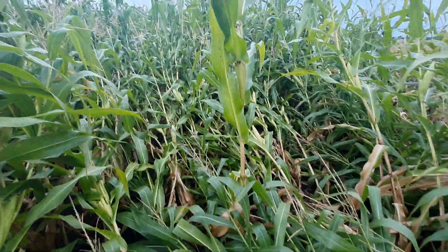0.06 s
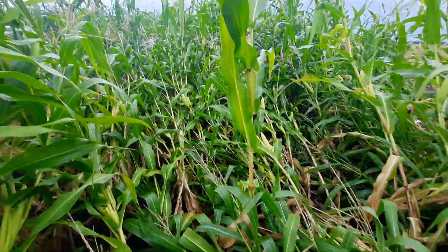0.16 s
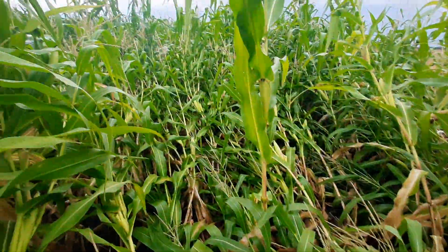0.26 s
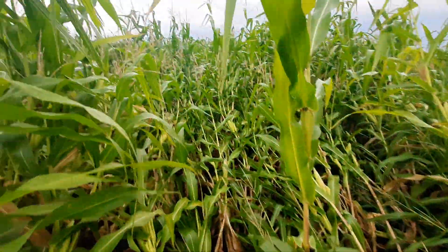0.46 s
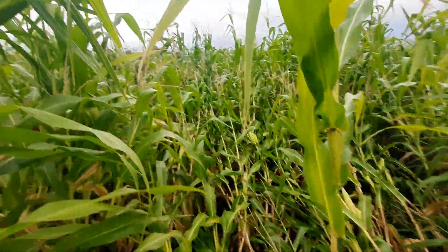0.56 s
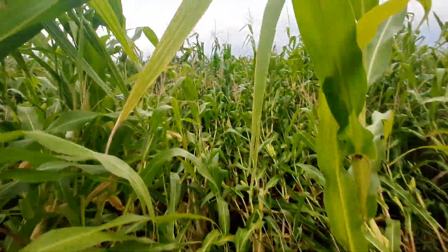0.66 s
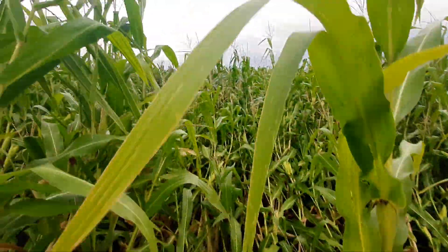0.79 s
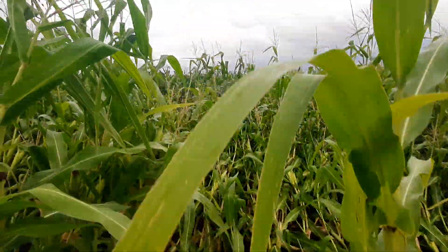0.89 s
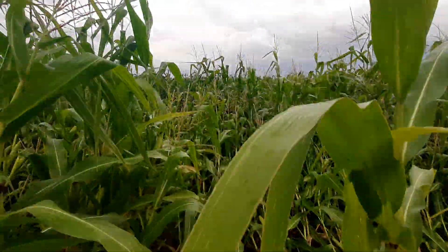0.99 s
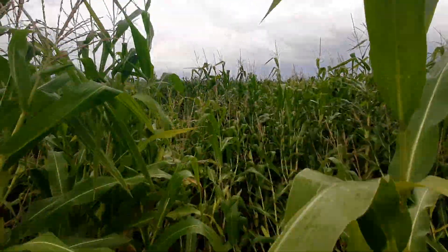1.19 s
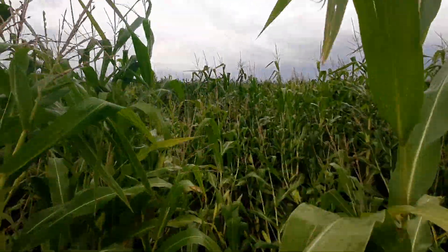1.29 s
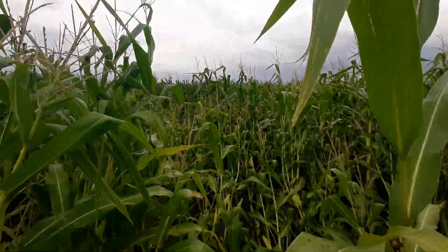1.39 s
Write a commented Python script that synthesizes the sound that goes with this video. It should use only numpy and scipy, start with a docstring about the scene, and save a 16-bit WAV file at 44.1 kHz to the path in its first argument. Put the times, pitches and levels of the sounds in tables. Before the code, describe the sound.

Corn leaves rustle in a field, starting softly and swelling from about 0.2 seconds to a crackly peak near 0.5. Close blades snap sharply around 0.25 and 0.5 seconds, with a soft flap near 0.3. The rustle then fades, with brief leaf scrapes from 0.75 to 1.1 seconds, and is very quiet by 1.4. Faint wind rumbles on the microphone, and a faint low hum dies by 0.9.

```python
"""Countless corn leaves rustle, swell and settle as a gust passes through a tall field.
Their tiny contacts crackle over a smooth rush and the dull swish of swinging blades.
Close by, single blades slide over each other with a rasp, snap as they buckle or strike,
and flap with a soft thud. Wind rumbles softly on the microphone and a faint low hum dies away."""
import sys
import numpy as np
from scipy import signal
from scipy.fft import rfft, irfft
from scipy.io import wavfile

SR = 44100
rng = np.random.default_rng(int(sys.argv[2]) if len(sys.argv) > 2 else 0)


def bounce(signal):
    """Save signal as a 16-bit WAV file at the path given by the first command-line argument."""
    frames = np.transpose(np.atleast_2d(signal))
    limited = np.clip(frames, -1, 1)
    pcm = np.round(limited * 32767).astype(np.int16)
    wavfile.write(sys.argv[1], SR, pcm)


N = 63945
TIME_S = np.arange(N) / SR
FREQS_HZ = np.fft.rfftfreq(N, 1 / SR)


def from_db(db):
    """Turn decibels into a number to multiply by."""
    return 10 ** (np.asarray(db) / 20)


def unit_power(x):
    """Scale a signal so that its average power is 1."""
    return x / np.sqrt(np.mean(x ** 2) + 1e-20)


def gain_curve(rows):
    """Join (time_s, level_db) points into a gain over time."""
    return from_db(np.interp(TIME_S, *np.transpose(rows)))


def over_freqs(rows):
    """Join (freq_hz, value) points into a curve over all frequencies."""
    hz, value = np.transpose(rows)
    return np.interp(np.log(FREQS_HZ + 1), np.log(hz), value)


def peak(centre_hz, width_octaves):
    """A bell-shaped bump of height 1 around one frequency."""
    return np.exp(-.5 * (np.log2((FREQS_HZ + 1) / centre_hz) / width_octaves) ** 2)


def pan(db):
    """Left and right gains: positive db leans left, negative leans right."""
    return from_db(np.array([[db], [-db]]) / 2)


def drift(rate_hz):
    """A smooth random wander, about 1 in size."""
    r = np.exp(-2 * np.pi * rate_hz / SR)
    return unit_power(signal.lfilter([1], [1, -2 * r, r * r], rng.standard_normal(2 * N))[N:])


def noise_pair():
    """Two unrelated white noises."""
    return rng.standard_normal((2, N))


# How alike left and right are (1 is the same, 0 unrelated): freq_hz, likeness
STEREO_LIKENESS = [(30, 0.63), (110, 0.87), (230, .9), (500, 0.86), (1000, 0.8), (2000, 0.33),
                   (4000, 0.053), (8000, 0)]

def spread(pair, tone_db):
    """Shape the tone of two signals and spread them: alike in the bass, apart in the treble."""
    mid, side = rfft(pair) * from_db(tone_db)
    alike = over_freqs(STEREO_LIKENESS)
    mid, side = mid * np.sqrt(1 + alike), side * np.sqrt(1 - alike)
    return unit_power(irfft([mid + side, mid - side], N))


def ring(clicks, hz, fade_s):
    """Each click starts a pure tone that falls 60 dB in fade_s."""
    r = np.exp(-np.log(1000) / (fade_s * SR))
    step = 2 * np.pi * hz / SR
    return signal.lfilter([0, np.sin(step)], [1, -2 * r * np.cos(step), r * r], clicks + 1e-18)


def die_away(start_s, fade_s):
    """A gain that jumps to 1, then falls 60 dB in fade_s."""
    return (TIME_S >= start_s) * np.exp(-np.log(1000) * np.maximum(TIME_S - start_s, 0) / fade_s)


def crackles(per_s=2600, pitches=24, size_spread_db=2.5, ring_cycles=7.2):
    """Leaves touch at random; each tiny contact rings briefly at its own pitch."""
    out = 0
    for hz in np.geomspace(1100, 8000, pitches):
        touches = rng.random(N) < per_s / pitches / SR
        size = from_db(size_spread_db * np.minimum(rng.exponential(1, N), 3))
        clicks = touches * size * rng.uniform(-1.04, 1, (2, N))
        out += ring(clicks, hz, ring_cycles / hz) * np.sqrt(hz)
    return unit_power(out)


# How loud the field rustles as the gust passes: time_s, level_db
RUSTLE_LEVELS = [(0, -46.5), (.09, -48), (.125, -45), (.225, -38), (.255, -31.5), (.39, -31.5), (.415, -28),
                 (.47, -27), (.49, -29.5), (.55, -31.5), (.61, -37.5), (.70, -44), (.79, -41.5),
                 (.89, -50.5), (1.04, -53.5), (1.11, -56), (1.2, -63), (1.32, -60), (1.45, -64.5)]
# The tone of the rustle, from low to high: freq_hz, level_db
RUSTLE_TONE = [(400, -28), (900, -22.5), (1250, -6.5), (1550, -5), (2400, -3), (3200, 0.5), (4600, -0.5),
               (6000, -3), (7400, -0.5), (8500, -4.5), (12000, -3.5), (16000, -9)]
# Hollow resonances of the stalks and leaves: pitch_hz, boost_db
HOLLOW_PEAKS = [(1210, 4), (1530, 6.5), (2030, 7), (3140, 0.5)]
# How the rustle's treble dips and rises: time_s, change_db
RUSTLE_TREBLE = [(.03, -4.5), (.16, -1), (.23, -1), (.265, -3.5), (.3, 1), (.52, 0.5), (.66, 0), (.9, 0),
                 (1.4, 1)]

def rustle(crackle_share=.22, treble_from_hz=6000, flutter_db=.78):
    """Near leaves crackle over the smooth rush of far ones, swelling with the gust."""
    hollow_db = sum(db * peak(hz, width_octaves=.022) for hz, db in HOLLOW_PEAKS)
    contacts = np.sqrt(crackle_share) * crackles() + np.sqrt(1 - crackle_share) * noise_pair()
    leaves = spread(contacts, over_freqs(RUSTLE_TONE) + hollow_db)
    treble = irfft(rfft(leaves) * FREQS_HZ ** 4 / (FREQS_HZ ** 4 + treble_from_hz ** 4), N)
    leaves += (gain_curve(RUSTLE_TREBLE) - 1) * treble
    flutter = from_db(flutter_db * drift(rate_hz=24))
    return gain_curve(RUSTLE_LEVELS) * flutter * leaves


# How loud the swinging blades are: time_s, level_db
SWISH_LEVELS = [(0, -67), (.09, -60), (.11, -50.5), (.21, -50.5), (.25, -44.5), (.33, -44), (.45, -41),
                (.53, -43.5), (.62, -49.5), (.75, -55), (.9, -62), (1.1, -69.5), (1.25, -77.5),
                (1.45, -78.5)]
# Their dull tone: freq_hz, level_db
SWISH_TONE = [(60, -27), (120, -4), (190, -5.5), (400, -2.5), (520, -4), (720, -2.5), (1000, -5),
              (1600, -6), (4000, -30)]

def swish():
    """Whole blades swing through the air with a dull swish."""
    return gain_curve(SWISH_LEVELS) * spread(noise_pair(), over_freqs(SWISH_TONE))


# Swirls of air that hit the microphone: peak_s, level_db, left_minus_right_db
SWIRLS = [(.07, -63, -7), (.22, -60, -4), (.41, -60, 5), (.55, -60, -18), (.66, -59.5, -17),
          (.77, -67, -13), (.87, -62, -4), (.985, -58, 3), (1.11, -66.5, 1)]
# The deep tone of the wind: freq_hz, level_db
WIND_TONE = [(25, -34), (40, -16), (60, -4), (85, -10.5), (130, -20.5), (300, -33), (1000, -70)]

def wind(steady_db=-70, swirl_width_s=.036, evenness=.41):
    """Air rumbles on the microphone and swells with each swirl, often mostly on one side."""
    swirls = 0
    for peak_s, db, side_db in SWIRLS:
        swell = np.exp(-.5 * ((TIME_S - peak_s) / swirl_width_s) ** 2)
        swirls += from_db(db) * pan(side_db) * swell
    rumble = spread(noise_pair(), over_freqs(WIND_TONE))
    strength = np.sqrt(np.mean(np.abs(signal.hilbert(rumble)) ** 2, axis=0))
    rumble = unit_power(rumble / strength ** evenness)  # evenness: 0 is lumpy, 1 is steady
    return np.hypot(from_db(steady_db) * pan(db=-4), swirls) * rumble


# How loud the hum is: time_s, level_db
HUM_LEVELS = [(0, -71), (.2, -62), (.65, -63), (.8, -66.5), (.95, -90), (1.45, -93.5)]

def hum(pitch_hz=216, waver_db=2.5):
    """A faint low tone wavers and dies away."""
    waver = from_db(waver_db * drift(rate_hz=10))
    tone = np.sin(2 * np.pi * pitch_hz * TIME_S + .5 * drift(rate_hz=4.1))
    return gain_curve(HUM_LEVELS) * waver * unit_power(tone)


# One blade slides over another (a negative fade grows louder):
# start_s, length_s, level_db, rasp_pitch_hz, rasp_boost_db, treble_boost_db, fade_db
BLADE_SLIDES = [(0.018, 0.0073, -46, 1760, 19, 4, -4.5), (0.099, 0.014, -38, 2250, 4.5, -46, 10.5),
                (0.196, 0.0077, -37.5, 6900, 8, -12, 3), (0.236, 0.033, -31.5, 4500, -1, 23, 0),
                (0.5076, 0.0061, -20, 5040, 3, 4, 1), (0.518, 0.015, -31, 5000, 0, 6, 3),
                (0.762, 0.02, -35, 3160, 8.5, 2.5, 3.5), (0.786, 0.043, -45.5, 3100, 18, 14, 0),
                (0.808, 0.055, -46.5, 5350, 4, 13, -3.5), (0.909, 0.049, -42, 4240, 4.5, 5.5, 4.5),
                (0.994, 0.03, -46.5, 4500, 0, 10, 1), (1.061, 0.064, -49.5, 4230, 2.5, 2.5, 7),
                (1.128, 0.054, -56, 4700, 2, 6, 3.5), (1.196, 0.015, -65, 5800, 9, 0, -4),
                (1.258, 0.069, -62, 5500, 7, 7, -2.5), (1.344, 0.012, -51.5, 4650, 7, 5, -4),
                (1.357, 0.033, -48, 2880, 9, -11, 17)]
# The tone that all slides start from: freq_hz, level_db
SLIDE_TONE = [(100, -46), (400, -11.5), (1000, -9), (1550, -6.5), (2500, -5), (4500, 1.5), (7300, -3.5),
              (12000, -8), (16000, -14)]

def slides(rise_s=.0024, release_s=.0038, treble_from_hz=5900):
    """Rough blades catch, rasp along each other and part."""
    out = 0
    treble = FREQS_HZ ** 2 / (FREQS_HZ ** 2 + treble_from_hz ** 2)
    for start_s, length_s, db, rasp_hz, rasp_db, treble_db, fade_db in BLADE_SLIDES:
        age_s = TIME_S - start_s
        catch = np.clip(age_s / rise_s, 0, 1)
        part = np.exp(-np.maximum(age_s - length_s, 0) / release_s)
        gain = from_db(db - fade_db * np.clip(age_s / length_s, 0, 1))
        boost_db = rasp_db * peak(rasp_hz, width_octaves=.12) + treble_db * treble
        out += catch * part * gain * spread(noise_pair(), over_freqs(SLIDE_TONE) + boost_db)
    return out


# A stiff blade buckles or strikes: start_s, level_db, ring_pitch_hz, ring_boost_db
BLADE_SNAPS = [(0.1059, -37, 2450, 0), (.159, -45, 740, 8), (0.2377, -19, 6060, -16),
               (.246, -22.5, 4440, -5), (0.3103, -35, 3130, 8.5), (0.3288, -33, 4080, 7),
               (.372, -29, 2050, -16), (0.405, -59, 2030, -10), (.4552, -20, 3170, 8),
               (.512, -27.5, 773, 0.5), (0.5565, -34, 2500, -13), (0.765, -34, 3350, 2.5),
               (1.159, -54, 3000, 2), (1.2212, -56, 1560, -4), (1.35, -53.5, 5100, 9), (1.364, -68, 650, 9)]
# The tones a blade rings with: times_ring_pitch, level_db
BLADE_TONES = [(.46, -7.5), (1, 2.5), (1.12, -8), (1.7, -8), (2.14, -10.5)]
# The tone of the crack: freq_hz, level_db
CRACK_TONE = [(100, -25), (400, -3.5), (800, 0.5), (1500, -6.5), (3500, 0), (7000, 2.5), (16000, -6.5)]

def snaps(echo_db=-23, ear_lag_s=.00003):
    """A stiff blade cracks and rings briefly; the crack scatters off the plants around."""
    out = 0
    for start_s, db, pitch_hz, ring_db in BLADE_SNAPS:
        direct = die_away(start_s, fade_s=.018)
        echo = from_db(echo_db) * die_away(start_s, fade_s=.11)
        crack = spread(noise_pair(), over_freqs(CRACK_TONE)) * (direct + echo)
        age_s = np.maximum(TIME_S - start_s - ear_lag_s * rng.standard_normal((2, 1)), 0)
        blade = sum((-1) ** k * from_db(tone_db) * np.sin(2 * np.pi * pitch_hz * ratio * age_s)
                    for k, (ratio, tone_db) in enumerate(BLADE_TONES))
        ringing = from_db(ring_db) * blade * die_away(start_s, fade_s=.016)
        out += from_db(db) * (crack + ringing)
    return out


# A broad leaf flaps: start_s, level_db
LEAF_FLAPS = [(.237, -37.5), (0.276, -30), (0.506, -46.5)]

def flaps(start_hz=460, end_hz=138, rise_s=.0049, drop_s=.0062):
    """A broad leaf pushes the air: a soft thud that drops in pitch."""
    out = 0
    for start_s, db in LEAF_FLAPS:
        age_s = np.maximum(TIME_S - start_s, 0)
        pitch_hz = end_hz + (start_hz - end_hz) * np.exp(-age_s / drop_s)
        push = age_s / rise_s * np.exp(1 - age_s / rise_s)
        phase = 2 * np.pi * np.cumsum(pitch_hz * (age_s > 0)) / SR
        out += from_db(db) * push * np.sin(phase)
    return out


def scene():
    """Leaves a little to the right, wind underneath, and the hum far to the right."""
    leaves = rustle() + swish() + slides() + snaps() + flaps()
    return leaves * pan(db=-1.67) + wind() + hum() * pan(db=-15.5)


# Treble bands that the microphone picks up weakly: centre_hz, width_hz, depth_db
TREBLE_DIPS = [(8600, 1290, -9.5), (9610, 2930, -6)]

def record(dry, cutoff_hz=15900):
    """The microphone softens two treble bands, and the very top is cut off."""
    for hz, width_hz, depth_db in TREBLE_DIPS:
        without_band = signal.lfilter(*signal.iirnotch(hz, hz / width_hz, fs=SR), dry)
        dry = without_band + from_db(depth_db) * (dry - without_band)
    return signal.sosfilt(signal.ellip(12, .1, 80, cutoff_hz, fs=SR, output="sos"), dry)


dry = scene()
out = record(dry)
bounce(out)
```